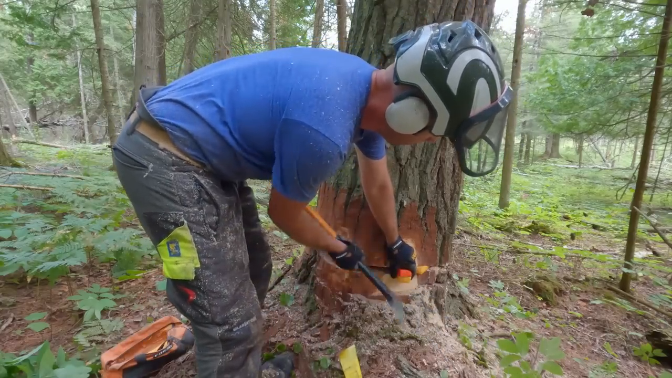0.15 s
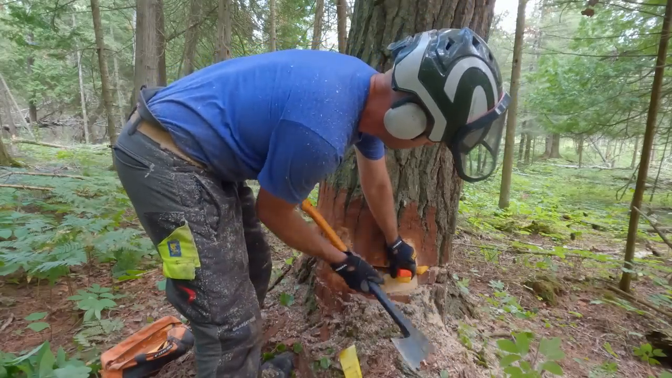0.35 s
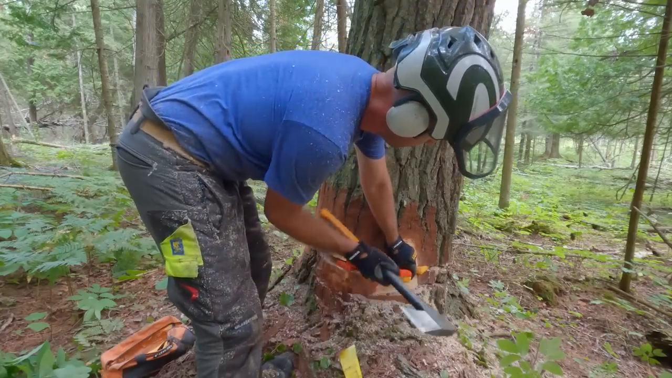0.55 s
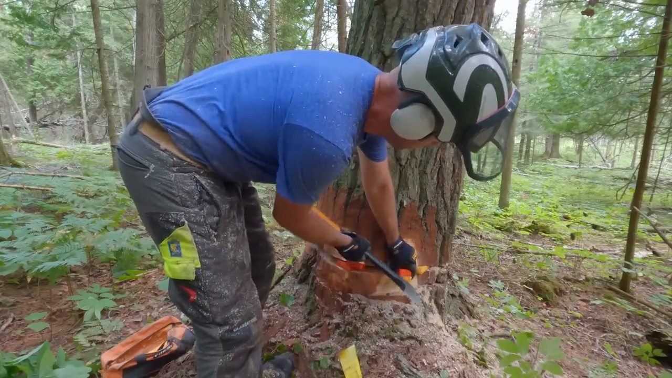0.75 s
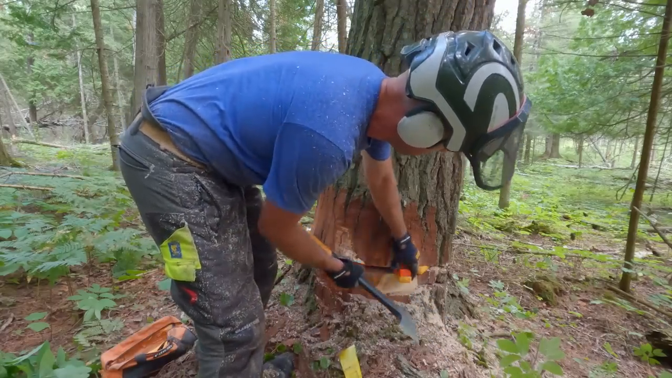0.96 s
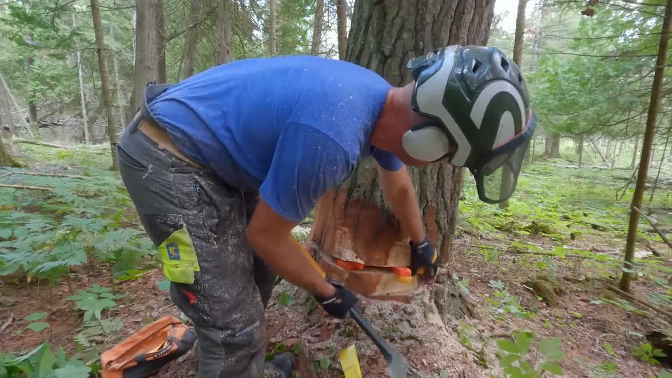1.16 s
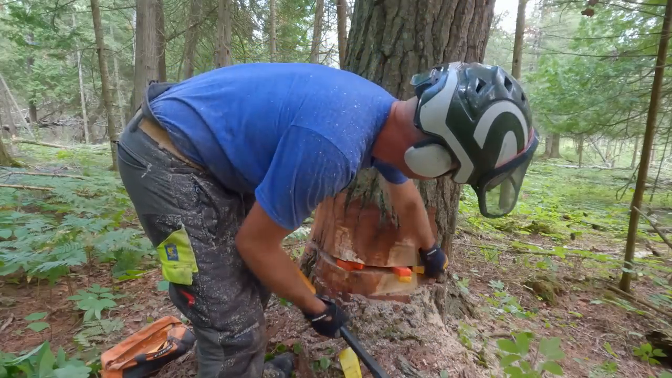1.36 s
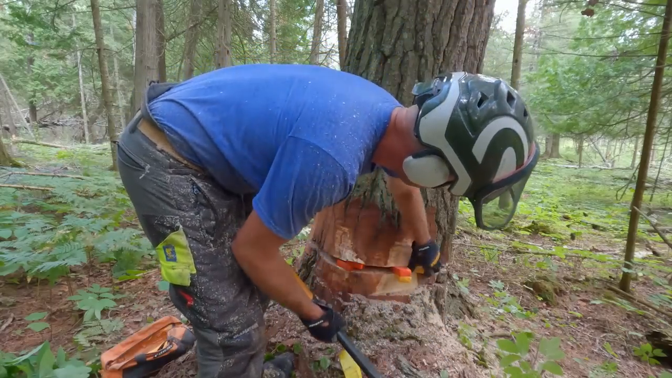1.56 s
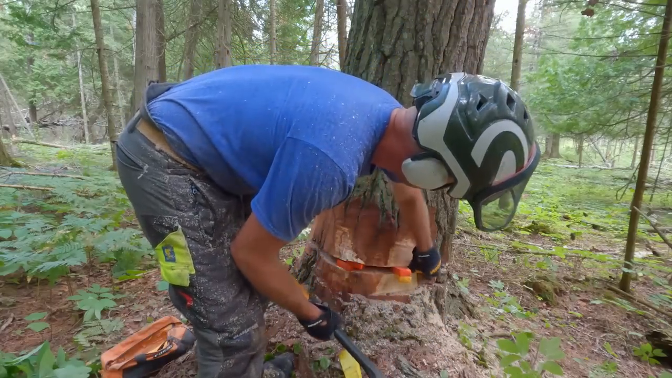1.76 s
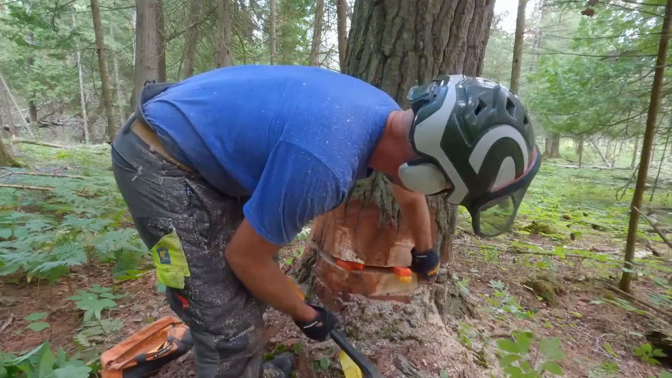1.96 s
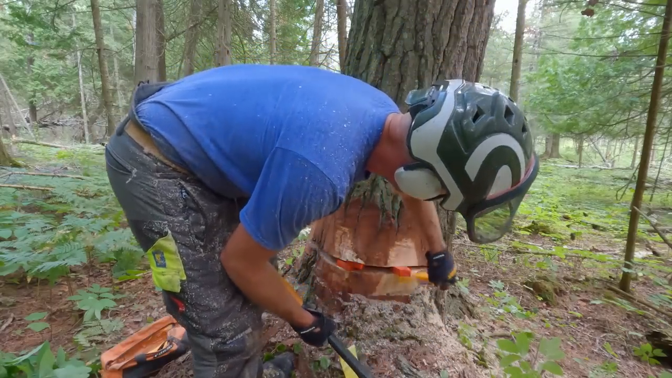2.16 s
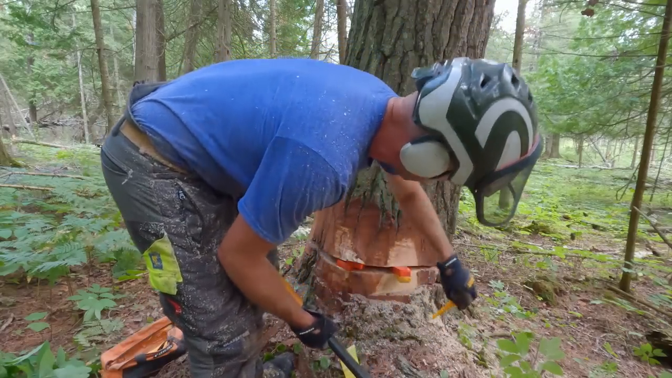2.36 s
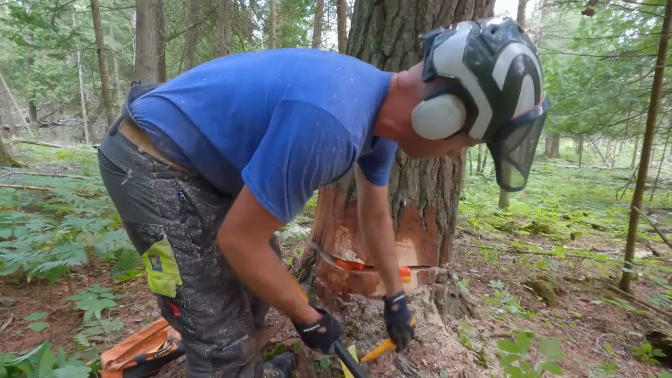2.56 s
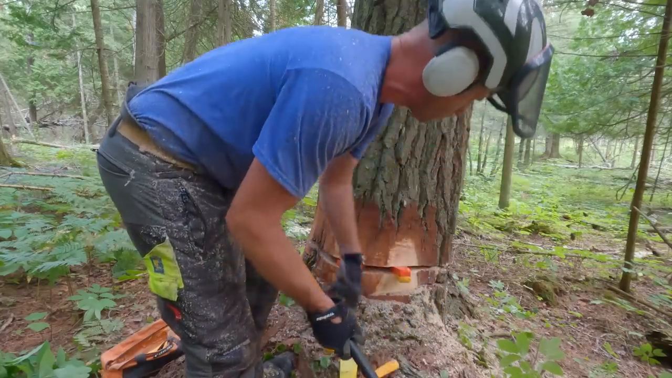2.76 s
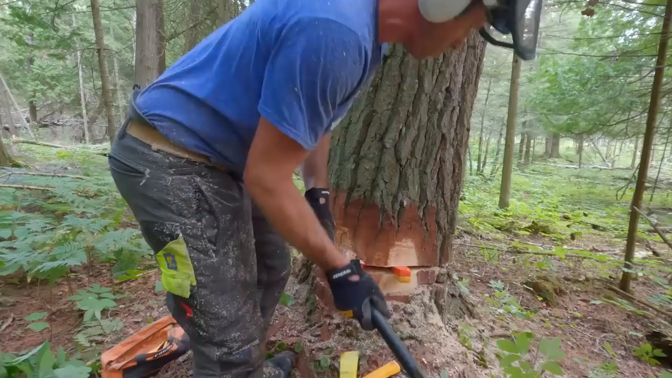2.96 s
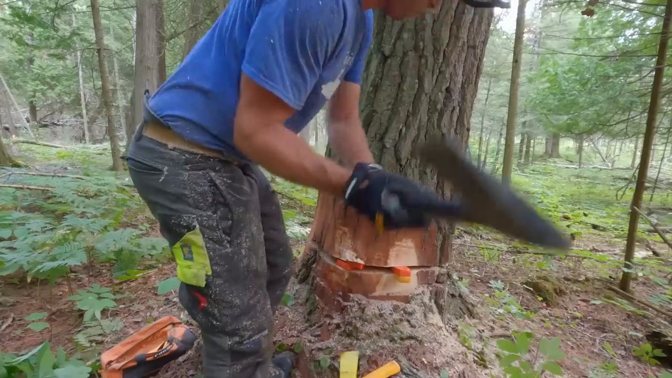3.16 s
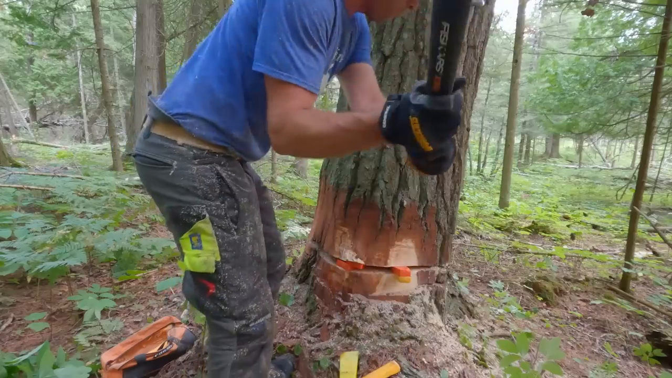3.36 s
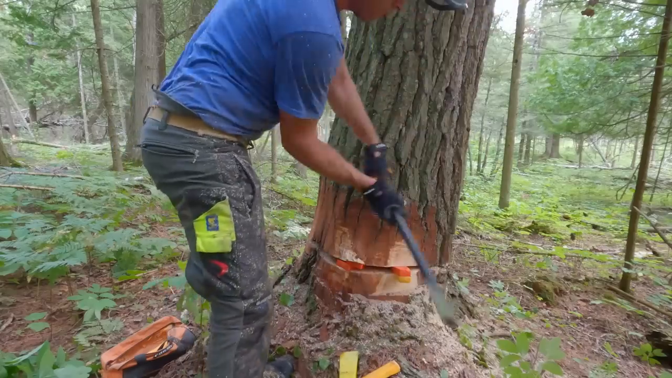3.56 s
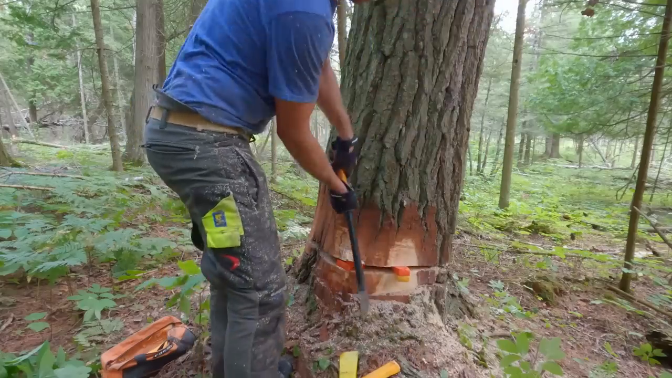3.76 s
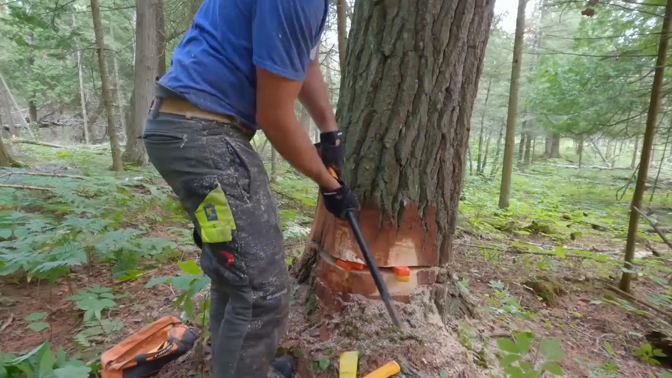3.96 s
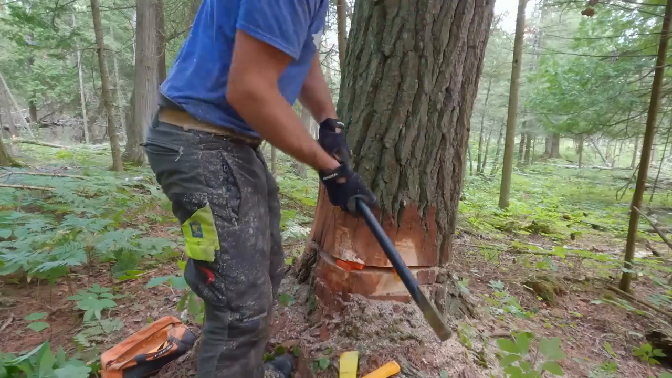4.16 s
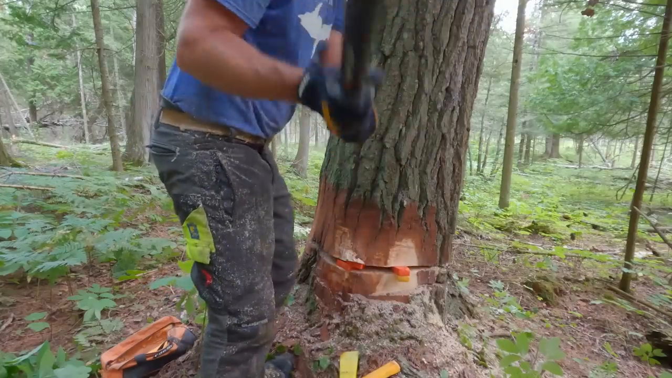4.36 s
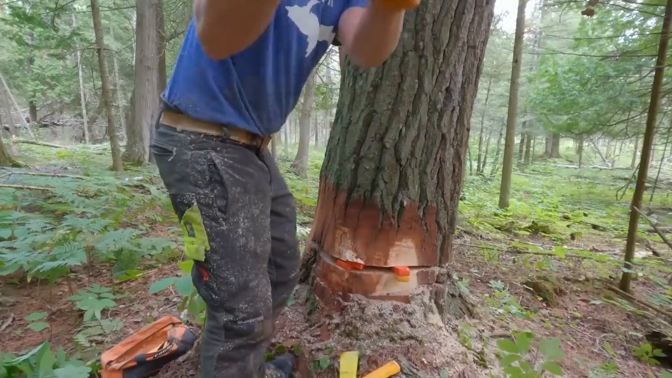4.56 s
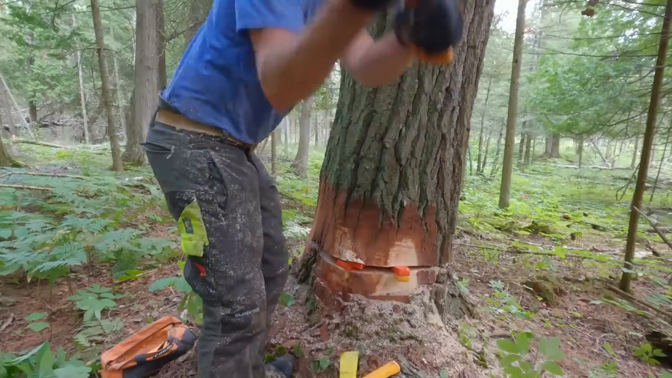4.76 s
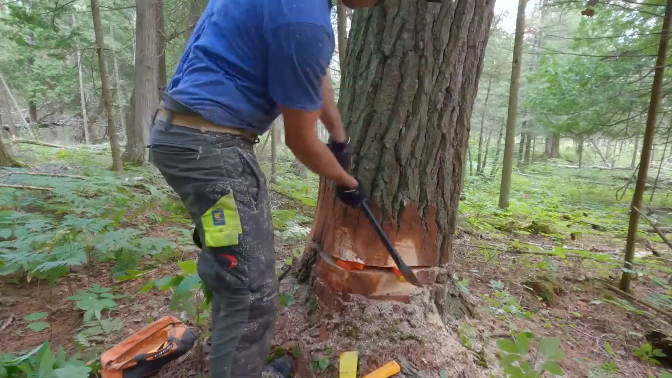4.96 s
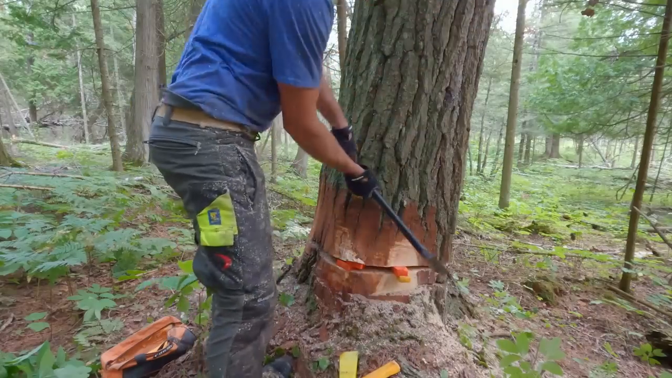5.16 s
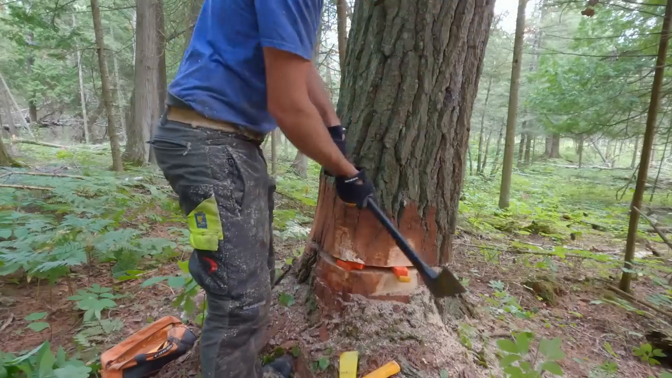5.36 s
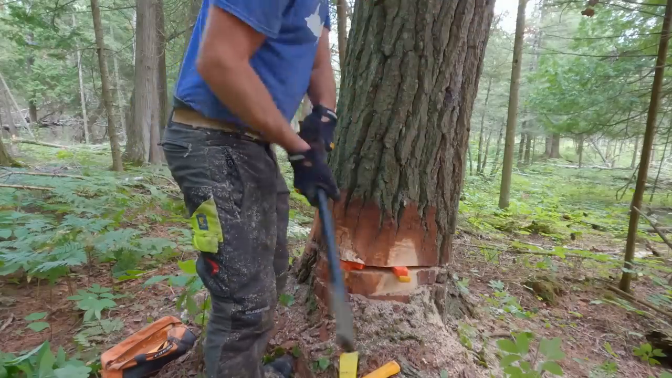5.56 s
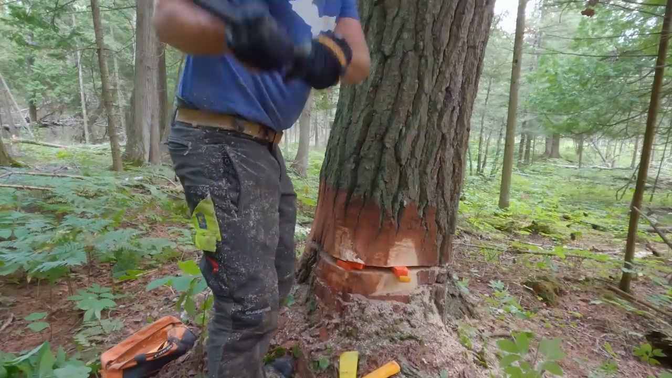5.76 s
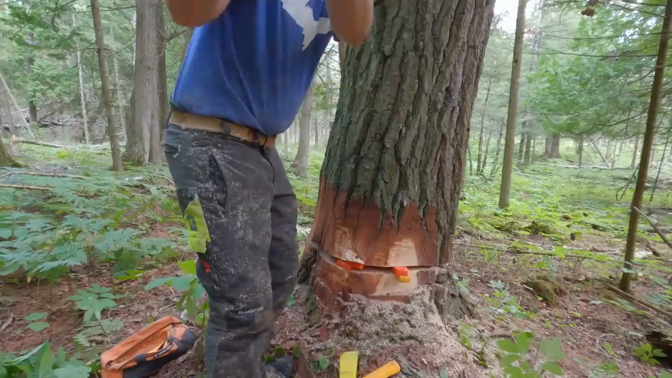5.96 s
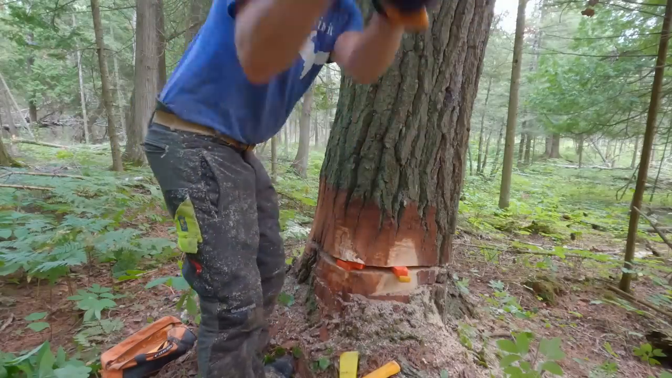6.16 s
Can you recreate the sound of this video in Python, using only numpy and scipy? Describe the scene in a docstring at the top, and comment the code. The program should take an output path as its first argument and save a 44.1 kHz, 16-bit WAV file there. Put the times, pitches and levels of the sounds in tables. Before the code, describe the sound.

Two quick taps of an axe head on a wedge snap dry and woody, followed by a spare plastic wedge knocking loose and landing in crackly leaves. After fabric movement and small clicks, two much harder swings crack sharply over a deep, brief trunk thud. The surrounding forest answers each with a noisy, fading wash. The microphone is very near, the air almost still, with soft low wind rumble.

```python
"""An axe head drives plastic felling wedges into the back cut of a standing conifer: two short swings, later two full ones.
Each blow is a crack of ringing modes and rasping noise, close to two microphone ports, over a boom of trunk modes.
The wood around answers from a distance with fading, coloured noise; a limiter ducks each crack and lets the echo swell.
In between a spare wedge, ringing freely, is knocked loose and tossed into the leaf litter.
Twigs and gear click, grit crumbles, clothes rustle in filtered crackle, and a faint breeze is drifting noise."""
import sys
import numpy as np
from scipy import signal
from scipy.fft import rfft, irfft
from scipy.io import wavfile
from scipy.ndimage import uniform_filter1d, minimum_filter1d

SR = 44100
rng = np.random.default_rng(int(sys.argv[2]) if len(sys.argv) > 2 else 0)


def inscribe(sig):
    """Save sig as 16-bit PCM at rate SR to the path in sys.argv[1].

    A 1-D sig is mono; a 2-D sig holds one channel per row.
    Samples are clipped to [-1, 1] before scaling.
    """
    pcm = np.round(np.clip(np.atleast_2d(sig).T, -1, 1) * 32767)
    wavfile.write(sys.argv[1], SR, pcm.astype(np.int16))


N = 273861

# breeze in the crowns, spectrum: (frequency [Hz], relative density [dB per Hz])
BREEZE_SPECTRUM = [(20, -14.5), (50, -19.5), (75, -25), (110, -23), (280, -14), (420, -15.5), (1090, -16),
                   (1600, -23), (2390, -38.5), (3950, -46.5), (5230, -39.5), (7110, -44), (11800, -53.5),
                   (16000, -65.5)]
# slow rise and fall of that breeze: (time [s], relative level [dB])
BREEZE_GUSTS = [(0, -2), (1.0, -2.5), (2.0, 0.5), (3.6, 3), (4.5, -3), (5.2, 1), (6.2, -4.5)]
# air rumbling at the microphone ports: (frequency [Hz], relative density [dB per Hz])
RUMBLE_SPECTRUM = [(10, -21.0), (22, -2.5), (31, 0.0), (45, -8.0), (62, -23), (100, -45.0), (300, -90.0)]
# colour of the echoing wood: (frequency [Hz], relative density [dB per Hz])
ECHO_SPECTRUM = [(100, -10.5), (400, -2), (900, -3.5), (1900, -2.5), (2900, -5), (3500, -8.5), (4500, -8),
                 (6500, -11.5), (8500, -26), (13000, -37.5)]
# rustling fabric: (frequency [Hz], relative density [dB per Hz])
CLOTH_SPECTRUM = [(800, -11.5), (2000, 1.5), (4000, 1), (7000, 0.5), (8500, -9.5), (12500, -10),
                  (14000, -17.5), (16000, -26.5)]
# movements of the body: (time of the height [s], level [dB], half-width down to -17 dB [s])
BODY_MOVES = [(0.034, -77, .06), (1.45, -73.5, 0.17), (1.92, -81, .13), (2.885, -64.5, 0.2),
              (3.523, -64, 0.47), (4.098, -66, 0.37), (4.682, -78, 0.13), (5.127, -68, 0.3),
              (6.104, -80.5, 0.26)]
# brushes of leaves, gloves and boots:
# (time of the height [s], level [dB], rise constant [s], fall constant [s], centre [Hz])
BRUSHES = [(2.26, -69, 0.05, 0.03, 3450), (2.509, -64, 0.022, 0.031, 3940), (2.69, -59, 0.035, 0.099, 377),
           (2.75, -47, 0.0053, 0.043, 4700), (3.336, -48.5, 0.039, 0.013, 4140),
           (3.471, -53, .0052, 0.0059, 290)]
# twigs, grit and gear clicking: (time [s], level [dB], centre [Hz])
CLICKS = [(1.2337, -53, 7450), (1.26, -55, 8500), (1.559, -56, 6510), (1.7833, -56.5, 3000),
          (2.159, -54.5, 3500), (2.7377, -29.5, 3240), (2.9913, -40.5, 2700), (3.1153, -49, 4350),
          (3.702, -40.5, 2450), (4.4204, -39.5, 1350)]
# spare wedge, ringing freely: (frequency [Hz], relative level before the mode weights [dB], t60 [s])
SPARE_WEDGE_MODES = [(758, -11, 0.21), (1020, -11.5, 0.055), (1224, 4, 0.11), (1400, 2.5, 0.042),
                     (1504, 7.5, 0.033), (1820, -15, .035), (2330, -18, 0.022), (2770, 12, 0.037),
                     (3700, -40, .07), (4850, -24, .06)]
# knocks of the spare wedge:
# (time [s], level [dB], pitch [ratio], most excited frequency [Hz], ring length [ratio])
SPARE_WEDGE_KNOCKS = [(2.2039, -27.5, 1.01, 1420, 0.69), (2.2479, -47.5, 1.3, 1590, 0.28),
                      (2.252, -48.5, 1.01, 400, 2.3), (2.7481, -24.5, .98, 1240, 0.99),
                      (3.468, -45.5, .96, 480, 0.53)]
# tree trunk: (frequency [Hz], relative level before the mode weights [dB], t60 [s])
TRUNK_MODES = [(55, -27, 0.26), (78.2, -13, 0.37), (83.6, -7.5, 0.23), (92.7, -3.05, 0.19),
               (103, -13.5, 0.37), (121, -13, 0.26), (154, -25, 0.47), (163.4, 0.0, 0.14),
               (182.7, -13, 0.3), (208, -19.5, 0.15), (257.7, -11.5, 0.13), (276, -4, 0.12),
               (283.4, -14, 0.26), (321, -17.5, 0.23), (506, -11.5, 0.08)]
# wedge pinched in the cut: (frequency [Hz], relative level [dB], t60 [s])
PINCHED_WEDGE_MODES = [(620, -21, 0.013), (1003, -2.5, 0.01), (1324, -6.5, 0.011), (1584, -8, 0.0089),
                       (2060, -5, .008), (2536, -4.5, 0.0084), (2816, -10.5, 0.018), (3910, -6.5, 0.0055),
                       (4440, -8, .007), (5283, -10, 0.0068), (6340, -8, 0.0064), (9900, -17, 0.014)]
# plastic slipping on wet wood: (frequency [Hz], relative density [dB per Hz])
SLIP_SPECTRUM = [(200, -8), (500, -4), (1000, 3.5), (3000, 1.5), (5000, -7), (7000, -9), (8500, -19.5),
                 (11000, -23.5), (16000, -31)]
# blows on the wedge: (time [s], force [dB], crack level [dB], pitch of the wedge's free end [Hz],
# contact cut-off [Hz], trunk level [dB], stutter level [dB], swelling ring level [dB])
BLOWS = [(0.1988, -8.5, -7, 1335, 3600, -21.5, -29.5, -35.5),
         (0.8230, -6.5, -3.5, 2350, 3850, -18.5, -24.5, -50.5),
         (3.7434, -5, 3.5, 3966, 5860, -12, -26.5, -27), (5.088, -2, 2.66, 4400, 11900, -11, -27.5, -22.5)]
# balance of near sounds at the two ports: (frequency [Hz], left minus right [dB])
PORT_BALANCE = [(80, 1.36), (170, -2.26), (700, -2.5), (2000, -3.5), (4500, 0.5), (13000, -2)]

# a harder blow slips further (dB for dB), overloads more and wakes more echo; values at 0 dB force
SLIP_DB, DRIVE, DRIVE_DB_PER_DB = -8, 2.8, 0.98
ECHO_DB, ECHO_DB_PER_DB = -46.5, 0.84
GRIT_PER_S, GRIT_DB, GRIT_HZ = 5, -64, 6500
BRUSH_Q, TICK_Q = 0.62, 0.37
STILL_DB, FLUTTER_DB = -96, 2.5  # cloth between movements; unevenness of the folds
PORT_LAG_S = .000023
TOP_HZ = 15900


def undb(db):
    """Decibels to gain."""
    return 10 ** (np.asarray(db) / 20)


def clock(seconds):
    """Sample times of a short sound."""
    return np.arange(int(seconds * SR)) / SR


def curve(rows):
    """Rows of (s, value) joined by straight lines."""
    return np.interp(np.arange(N) / SR, *np.transpose(rows))


def along(points, hz):
    """Rows of (Hz, value) read on a log-frequency axis."""
    f, value = np.transpose(points)
    return np.interp(np.log(hz + 1), np.log(f), value)


def unit(x):
    """Scale to rms 1."""
    return x / np.sqrt(np.mean(x ** 2))


def peak(x):
    """Scale to peak 1."""
    return x / np.abs(x).max()


def colour(x, points):
    """Give x a spectrum, at rms 1."""
    n = x.shape[-1]
    gain = undb(along(points, np.fft.rfftfreq(n, 1 / SR)))
    return unit(irfft(rfft(x) * gain, n))


def band(x, hz, q):
    """One broad resonance, gain 1 at its centre."""
    w = 2 * np.pi * min(hz, SR / 2 - 2000) / SR
    a = np.sin(w) / (2 * q)
    return signal.lfilter([a, 0, -a], [1 + a, -2 * np.cos(w), 1 - a], x)


def lowpass(x, hz, order=1):
    """Roll off the treble."""
    return signal.sosfilt(signal.butter(order, min(hz, SR / 2 - 2000), fs=SR, output="sos"), x)


def walk(rate):
    """Slow random drift at rms 1."""
    k = int(SR / rate)
    steps = np.repeat(rng.standard_normal(N // k + 1), k)
    return unit(uniform_filter1d(uniform_filter1d(steps, k), k)[:N])


def grains(n, spread_db):
    """Noise made of tiny crackles of uneven size, 32 samples each."""
    size_db = spread_db * np.minimum(rng.exponential(size=n // 32 + 1), 5)
    sizes = np.repeat(undb(size_db), 32)[:n]
    return unit(rng.standard_normal(n) * sizes)


def spread(mid, side, side_db):
    """Left and right from a shared and an opposed part."""
    return mid + undb(side_db) * np.array([side, -side])


def ring(modes, seconds, pitch=1, length=1, weight=-1):
    """Decaying modes; each is multiplied by one more weight, so -1 makes neighbours swing oppositely."""
    t = clock(seconds)
    total = np.zeros(len(t))
    for k, (hz, db, t60) in enumerate(modes):
        fade = undb(db - 60 * t / (t60 * length))
        total += weight ** k * fade * np.sin(2 * np.pi * hz * pitch * t)
    return total


def add(out, s, x):
    """Mix x into out from time s."""
    i = int(round(s * SR))
    out[..., i:i + x.shape[-1]] += x[..., :N - i]


def breeze():
    """A soft rush in the crowns, and air rumbling unevenly at the microphone ports."""
    mid, side = (colour(rng.standard_normal(N), BREEZE_SPECTRUM) for _ in range(2))
    rush_db = -66 + curve(BREEZE_GUSTS) + 0.58 * walk(6)
    rush = undb(rush_db) * spread(mid, side, side_db=-8.0)
    rumble = colour(rng.standard_normal(N), RUMBLE_SPECTRUM)
    return rush + undb(-63.0 + 2.0 * walk(11)) * rumble


def forest_echo(t60=1.42, treble_t60=1.0, ground_lag_s=.0011, ground_gain=0.073):
    """Countless trunks scatter each crack back in its own colour; the treble dies a little sooner."""
    out, t = np.zeros((2, N)), clock(1.1)
    decay, treble_decay = np.log(1000) / t60, np.log(1000) / treble_t60
    for s, force_db, _, end_hz, contact_hz, *_ in BLOWS:
        slip_db, drive = yielding(force_db)
        scatter = spread(grains(len(t), spread_db=1.5), grains(len(t), spread_db=3.0), side_db=-5.5)
        snap = crack(end_hz, contact_hz, slip_db, drive)
        returns = signal.fftconvolve(scatter[:, ::-1], snap[None])[:, :len(t)]
        wash = colour(scatter, ECHO_SPECTRUM) + undb(-2.0) * unit(lowpass(returns, 4800, order=4))
        # a second path over the ground combs the echo into bands
        wash = unit(wash + ground_gain * np.roll(wash, int(ground_lag_s * SR), axis=1))
        low = lowpass(wash, 1900)
        echo = low * np.exp(-decay * t) + (wash - low) * np.exp(-treble_decay * t)
        # a denser stand some way off answers harder blows more strongly, late and dull
        late_swell = np.exp(-decay * t - ((t - .22) / 0.061) ** 2)
        echo += undb(slip_db + 12.5) * band(wash, 720, q=0.8) * late_swell
        level = undb(ECHO_DB + ECHO_DB_PER_DB * force_db)
        add(out, s, level * echo * (1 - np.exp(-t / 0.0014)))
    return out


def clothes():
    """Fabric rustles as the body bends and swings: each movement swells and fades in a bell shape."""
    t = np.arange(N) / SR
    effort = undb(STILL_DB)
    for s, db, half_width in BODY_MOVES:
        effort = effort + undb(db) * np.exp(-2 * ((t - s) / half_width) ** 2)
    mid, side = (colour(grains(N, spread_db=2.5), CLOTH_SPECTRUM) for _ in range(2))
    return effort * undb(FLUTTER_DB * walk(28)) * spread(mid, side, side_db=-8.0)


def tick(hz):
    """A tiny snap of noise with a short tail, at peak 1."""
    t = clock(.04)
    snap = rng.standard_normal(len(t)) * (np.exp(-t / 0.00062) + undb(-17.5) * np.exp(-t / 0.016))
    return peak(band(band(snap, hz, TICK_Q), hz, TICK_Q))


def grit():
    """Fine grit under the boots gives way at random moments, each crumb the same faint tick."""
    crumbs = (rng.random(N) < GRIT_PER_S / SR) * undb(GRIT_DB)
    return signal.fftconvolve(crumbs, tick(GRIT_HZ))[:N]


def small_sounds():
    """Twigs and gear click; leaves, gloves and boots brush in short crackly swells."""
    out = np.zeros(N)
    for s, db, hz in CLICKS:
        add(out, s, undb(db) * tick(hz))
    crackle = grains(N, spread_db=2.5)
    for s, db, rise, fall, hz in BRUSHES:
        lag = np.arange(N) / SR - s
        swell = np.exp(np.minimum(lag / rise, -lag / fall))
        out += undb(db) * swell * unit(band(band(crackle, hz, BRUSH_Q), hz, BRUSH_Q))
    return lowpass(out, 12780, order=8)


def spare_wedge():
    """The loose wedge clacks free, rattles, lands and is nudged; where it is struck decides which modes speak."""
    out, t = np.zeros(N), clock(.3)
    for s, db, pitch, excited_hz, length in SPARE_WEDGE_KNOCKS:
        tone = peak(ring(SPARE_WEDGE_MODES, .3, pitch, length, weight=0.81))
        clack = peak(band(rng.standard_normal(len(t)), 930, q=0.28) * np.exp(-t / 0.011))
        knock = band(tone + undb(-3) * clack, excited_hz, q=2.27)
        knock = band(knock, excited_hz, q=0.2)
        add(out, s, undb(db) * peak(knock))
    return out


def boom(contact_hz):
    """The trunk takes a few ms to swing up, duller after a gentle swing; a faint low rumble lingers around it."""
    t = clock(.8)
    swing = ring(TRUNK_MODES, .8, weight=0.93) * (1 - np.exp(-t / 0.0063))
    body = peak(lowpass(swing, 0.14 * contact_hz))
    rumble = unit(band(band(rng.standard_normal(len(t)), 215, q=0.8), 215, q=0.8))
    return body + undb(-24) * rumble * np.exp(-t / 0.028) * (1 - np.exp(-t / 0.0033))


def yielding(force_db):
    """Slip level in dB and overload drive for a blow of this force."""
    return SLIP_DB + force_db, DRIVE * undb(DRIVE_DB_PER_DB * force_db)


def crack(end_hz, contact_hz, slip_db, drive):
    """Steel on plastic: the wedge rings for a few ms and rasps inward; a shorter free end sounds higher."""
    t = clock(.04)
    slip_fade = np.exp(-(t / 0.0026) ** 2) + undb(-27.5) * np.exp(-t / 0.012)
    slip = colour(rng.standard_normal(len(t)), SLIP_SPECTRUM) * slip_fade
    body = peak(ring(PINCHED_WEDGE_MODES, .04)) + undb(slip_db) * slip
    body = body * (1 - np.exp(-t / 0.00023))
    # a gentler swing stays longer in contact and sounds duller
    bright = lowpass(undb(-3.5) * body + band(body, end_hz, q=2.7), contact_hz)
    # so near and loud that its first cycles are squashed
    squashed = peak(np.tanh(drive * peak(bright)))
    steel_tick = band(rng.standard_normal(len(t)), 10200, q=3.3) * np.exp(-t / 0.0013)
    # the further the wedge slips, the harder it shoves the walls of the cut
    shove = undb(slip_db - 6.5) * np.sin(2 * np.pi * 470 * t) * np.exp(-t / 0.0025)
    return peak(squashed + shove + undb(-16.5) * steel_tick)


def frayed_attack(s, snap, stutter_db, swell_db, gap_s=.0106, step_db=11):
    """A stutter of ticks, each louder than the last, and a thin swelling ring grow into the blow."""
    lead = np.zeros(N)
    stutter = peak(band(snap, 2700, q=0.38))
    for k in range(4):  # counted back from the blow
        add(lead, s - (k + 1) * gap_s, undb(stutter_db - k * step_db) * stutter)
    t = clock(.05)
    fading_ring = np.exp(-t / 0.0075) * np.sin(2 * np.pi * 905 * t)
    add(lead, s - t[-1], undb(swell_db) * fading_ring[::-1])  # reversed, so that it swells
    return lead


def axe_blows():
    """Each blow cracks in the wedge and sets the trunk booming 3.5 ms later."""
    out = np.zeros(N)
    for s, force_db, crack_db, end_hz, contact_hz, trunk_db, stutter_db, swell_db in BLOWS:
        snap = crack(end_hz, contact_hz, *yielding(force_db))
        add(out, s, undb(crack_db) * snap)
        add(out, s + .0035, undb(trunk_db) * boom(contact_hz))
        out += frayed_attack(s, snap, stutter_db, swell_db)
    return out


def ports(x):
    """A near sound reaches the right microphone port slightly sooner, and louder over most of the range."""
    hz = np.fft.rfftfreq(N, 1 / SR)
    # half of the balance and lag goes to the left port, the inverse to the right
    half = undb(along(PORT_BALANCE, hz) / 2) * np.exp(-1j * np.pi * hz * PORT_LAG_S)
    return irfft(rfft(x) * np.array([half, 1 / half]), N)


def scene():
    """Work at the foot of the tree, close to the microphone, inside the sound of the wood."""
    near = ports(grit() + small_sounds() + spare_wedge() + axe_blows())
    return breeze() + forest_echo() + clothes() + near


def record(dry, ceiling_db=-8, release_db_per_s=50):
    """A look-ahead limiter ducks at each crack and recovers steadily; then the top is cut."""
    level_db = 20 * np.log10(np.abs(dry).max(axis=0) + 1e-9)
    over_db = np.maximum(level_db - ceiling_db, 0)
    ramp = release_db_per_s * np.arange(N) / SR
    gain_db = ramp - np.maximum.accumulate(over_db + ramp)
    # about 1 ms wide: duck ahead of the peak, with soft edges
    gain_db = uniform_filter1d(minimum_filter1d(gain_db, size=45), size=45)
    top_cut = signal.ellip(8, .2, 70, TOP_HZ, fs=SR, output="sos")
    return signal.sosfilt(top_cut, dry * undb(gain_db))


dry = scene()
out = record(dry)
inscribe(out)
```